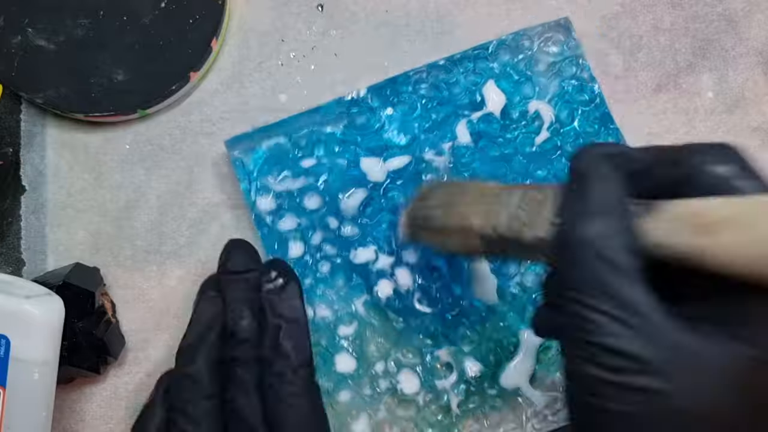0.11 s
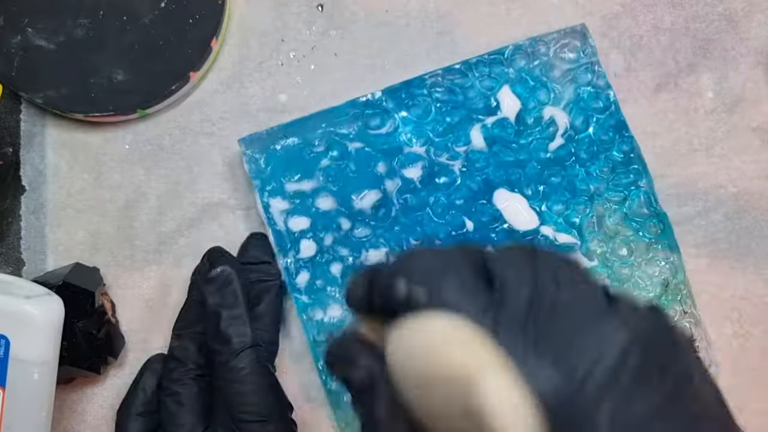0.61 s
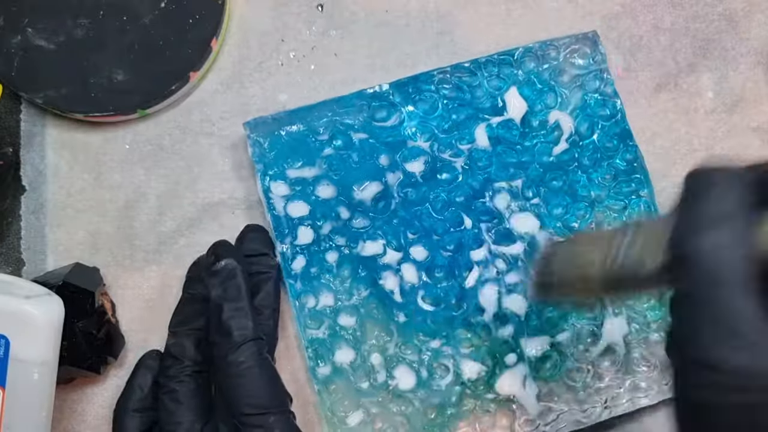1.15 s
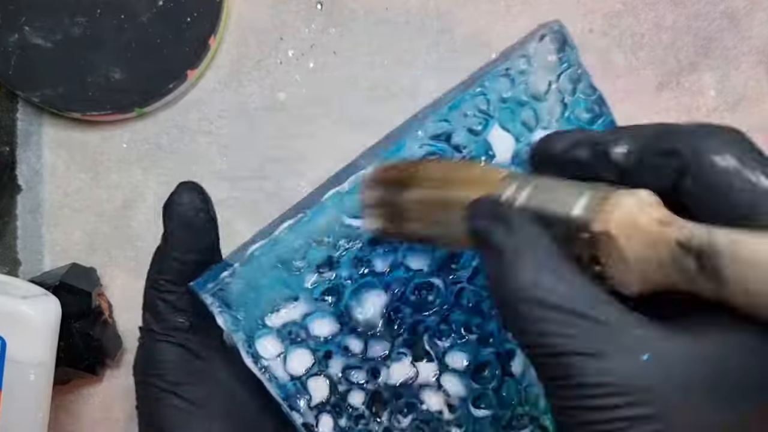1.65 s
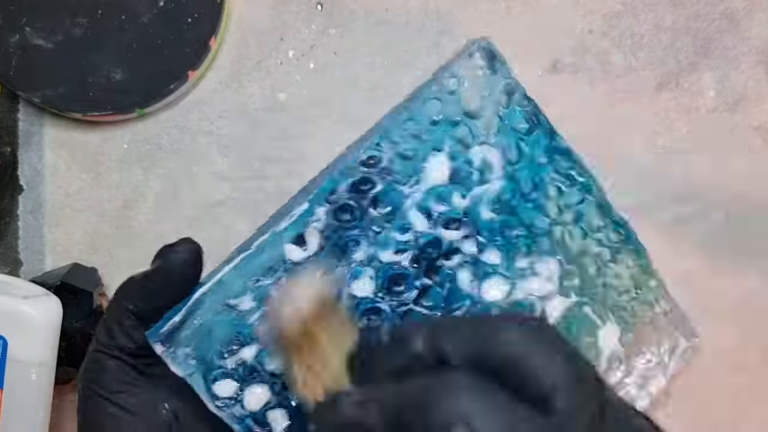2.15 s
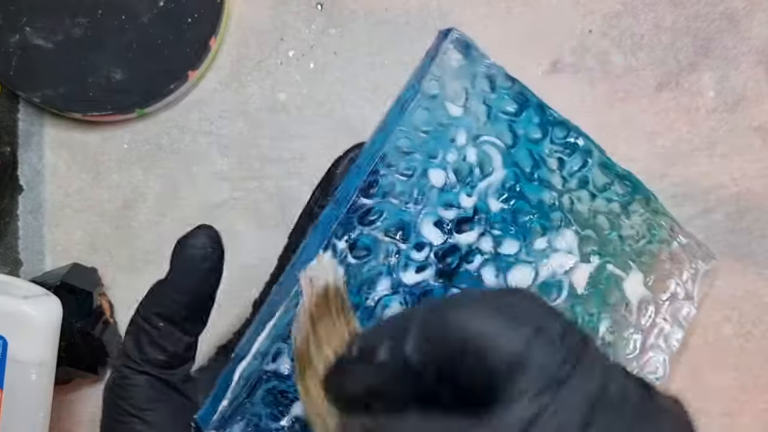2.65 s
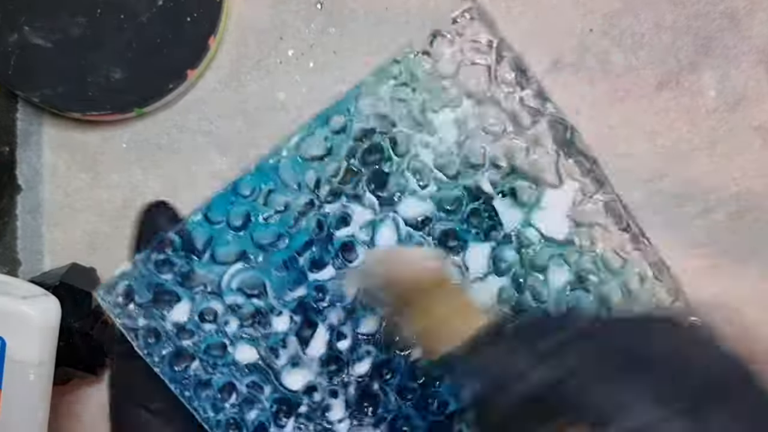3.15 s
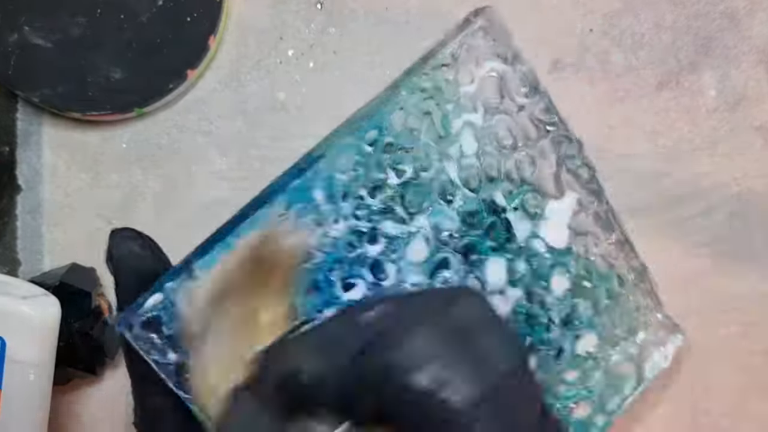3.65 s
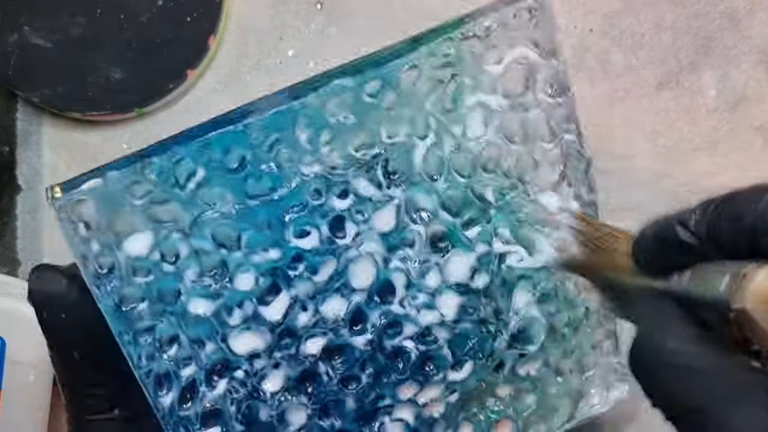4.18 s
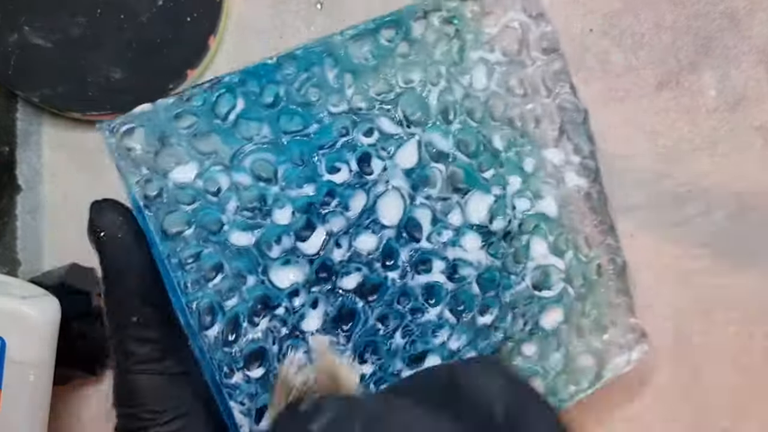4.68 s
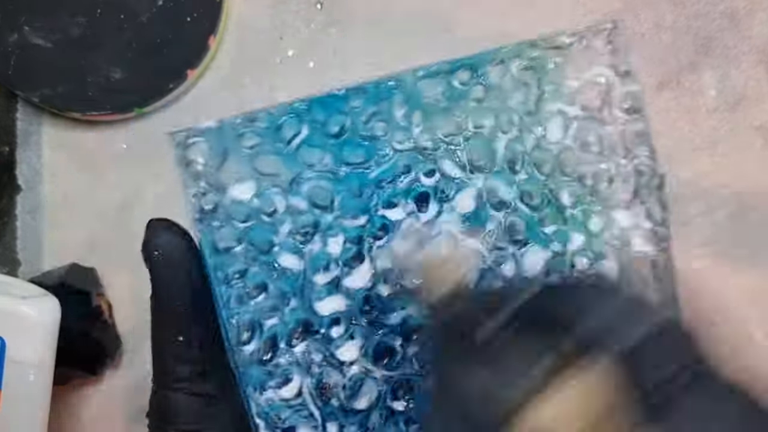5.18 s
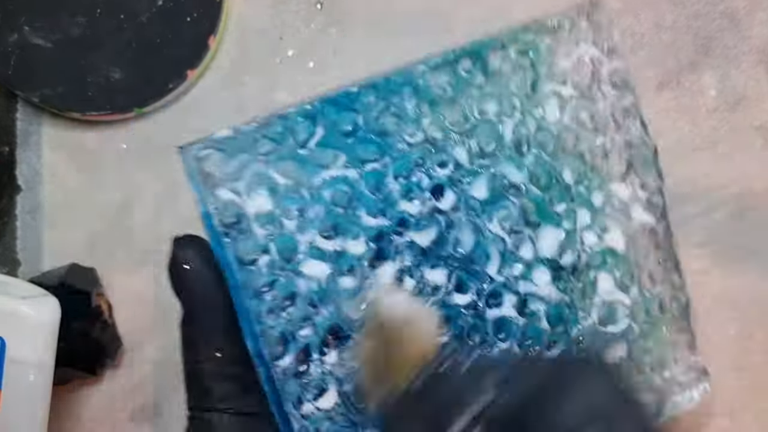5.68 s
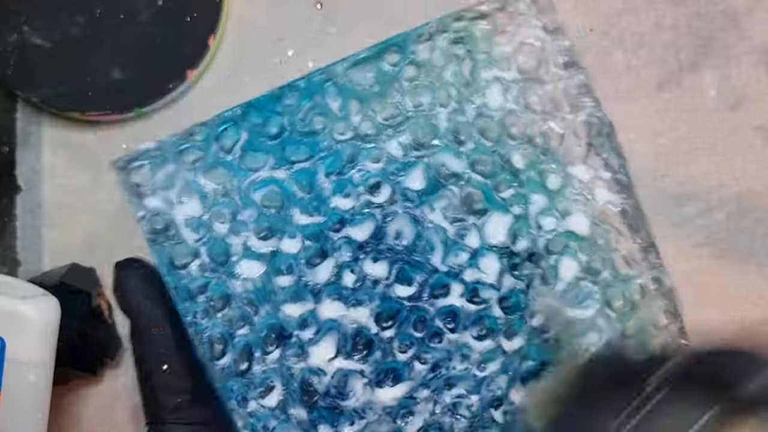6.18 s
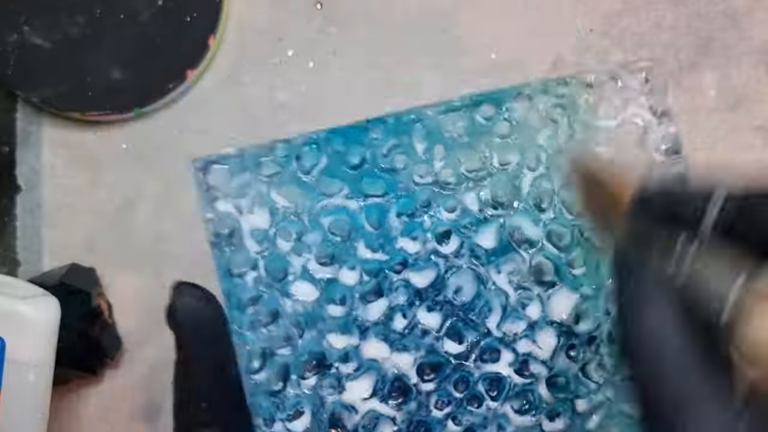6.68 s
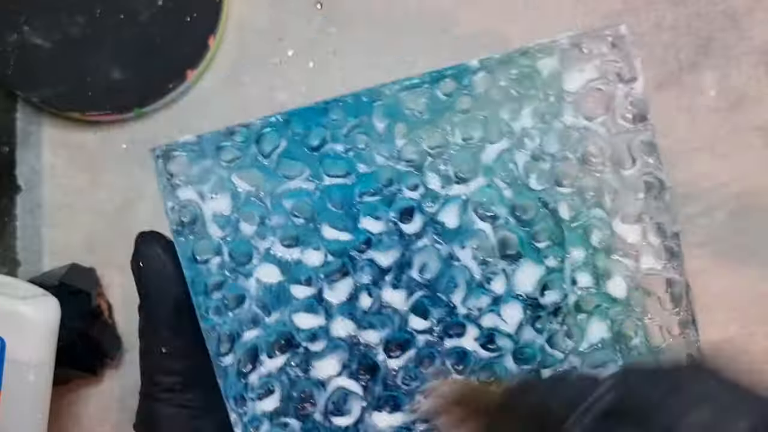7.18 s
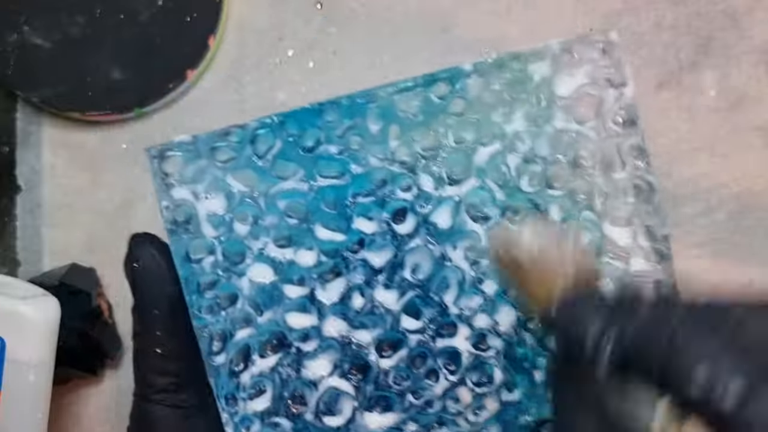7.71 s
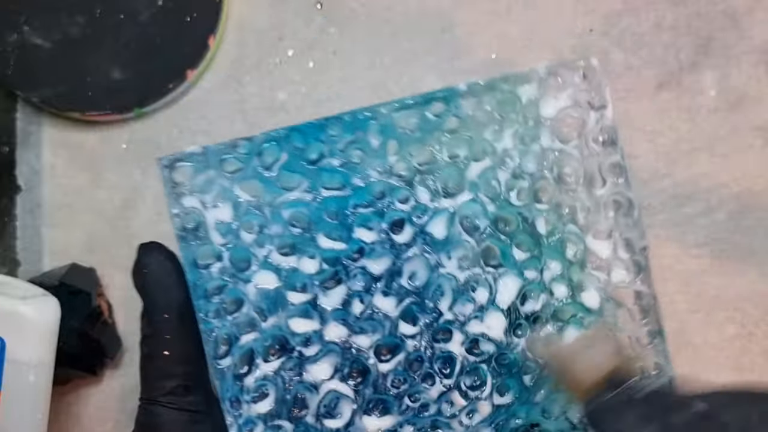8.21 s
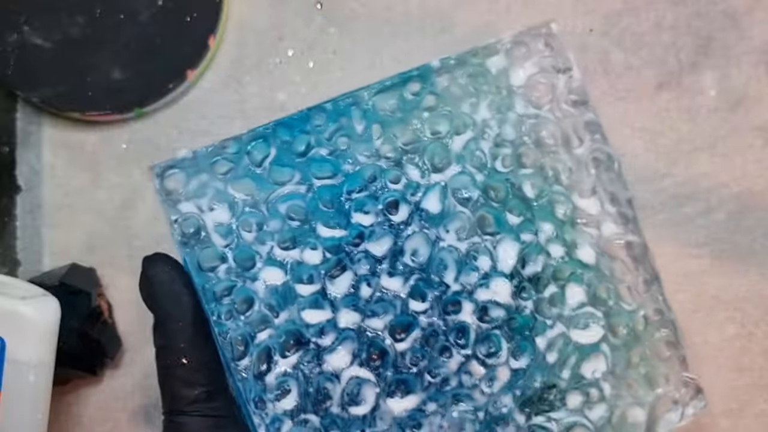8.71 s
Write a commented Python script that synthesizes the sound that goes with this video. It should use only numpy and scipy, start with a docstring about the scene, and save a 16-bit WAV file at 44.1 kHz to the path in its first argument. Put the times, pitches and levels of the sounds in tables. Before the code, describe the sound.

A stiff bristle brush scrubs wet glue over a dimpled resin tile in quick scratchy bursts, with low table thumps and tiny clicks.

```python
"""In a quiet room a bristle brush scrubs glue over a dimpled resin tile: sped-up scrubbing in short spliced bursts.
Flicks and hiss scratch and rub the tile's modes, which ring more freely for the first 3 s, as it rests on the table.
Pushes thump the table top on damped modes and rattle the tile; bristle tips snap out of dimples as clicks with spray.
From 3 s a glove at times sounds the hollow under the tile; from 7.2 s six strokes at natural speed land, drag and lift.
A close pair of microphones hears it all, with a faint answer from the walls."""
import sys
import numpy as np
from scipy import signal
from scipy.fft import rfft, irfft, next_fast_len
from scipy.io import wavfile
from scipy.ndimage import uniform_filter1d, map_coordinates

SR = 44100
rng = np.random.default_rng(int(sys.argv[2]) if len(sys.argv) > 2 else 0)


def transcribe(signal):
    """Save signal, clipped to [-1, 1], as a 16-bit WAV file at the path in sys.argv[1]."""
    frames = np.atleast_2d(signal).T
    limited = np.clip(frames, -1, 1)
    pcm = np.round(limited * 32767).astype(np.int16)
    wavfile.write(sys.argv[1], SR, pcm)


def makeup_ratio(level_db):
    """Linear amplitude ratio for a level in decibels (20 dB per factor of ten)."""
    decades = np.asarray(level_db, float) / 20
    return 10 ** decades


N = 389657
HZ = np.fft.rfftfreq(next_fast_len(N + SR // 4), 1 / SR)
TIME_S = np.arange(N) / SR


def unit(x):
    """Scaled to rms 1."""
    return x / np.sqrt(np.mean(x ** 2) + 1e-20)


def along(points):
    """(Hz, value) points read on a log frequency axis."""
    hz, value = np.transpose(points)
    return np.interp(np.log(HZ + 1), np.log(hz + 1), value)


def at_time(points):
    """(s, value) points read at every sample."""
    return np.interp(TIME_S, *np.transpose(points))


def filtered(x, response):
    """x through a complex frequency response."""
    size = 2 * len(HZ) - 2
    return irfft(rfft(x, size) * response, size)[..., :N]


def drift(per_s):
    """A smooth random curve through per_s random points a second."""
    points = rng.standard_normal(int(N * per_s / SR) + 4)
    return map_coordinates(points, [np.arange(N) * per_s / SR])


# Each row: frequency in Hz, left-right likeness from 0 to 1.
LIKENESS = [(60, 0.9), (300, 0.65), (1400, 0.47), (3100, 0.21), (6800, 0.028)]


def paired(sources, spectrum):
    """Two unrelated sources mixed to left and right of the set likeness, coloured, rms 1."""
    turn = np.arccos(np.clip(along(LIKENESS), 0, 1)) / 2
    mid, side = filtered(sources, makeup_ratio(along(spectrum)) * np.array([np.cos(turn), np.sin(turn)]))
    return unit(np.array([mid + side, mid - side]))


def flicks(per_s, spread_db, share):
    """Single bristles let go at random, sizes with a long tail, over the hiss of the sliding rest."""
    fires, size, sign = rng.random((3, 2, N))
    size_gain = makeup_ratio(-spread_db * np.log(size + 1e-9))
    clicks = (fires < per_s / SR) * size_gain * np.sign(sign - 0.5)
    hiss = rng.standard_normal((2, N))
    return np.sqrt(share) * unit(clicks) + np.sqrt(1 - share) * hiss  # share of the power in clicks


def patchy(x, depth_db, size, order):
    """Random gain patches, order bins wide: wide and brief for bunches letting go, narrow and slow for dimples."""
    z = signal.stft(x, nperseg=size)[2]
    field = uniform_filter1d(rng.standard_normal(z.shape[1:]), order, axis=0)
    field = uniform_filter1d(field, size=3, axis=1)
    return signal.istft(z * makeup_ratio(depth_db * unit(field)), nperseg=size)[1][:, :N]


def swells(start_s, length_s, db, rise):
    """Stereo power of blunt swells, 9 dB down at both ends, each nearer one microphone or the other."""
    power = np.zeros((2, N))
    sway_db = rng.normal(0, 1.3, len(start_s))
    rows = np.broadcast(start_s, length_s, db, np.clip(rise, 0.05, 0.95))
    for (start, length, peak_db, rise), left_db in zip(rows, sway_db):
        first = max(int((start - rise * length) * SR), 0)
        i = np.arange(first, min(int((start + 2 * length) * SR), N))
        lag = (i / SR - start) / length - rise
        away = np.where(lag < 0, -lag / rise, lag / (1 - rise))
        power[:, i] += makeup_ratio(2 * (peak_db - 9 * away ** 3.46) + [[left_db], [-left_db]])
    return power


def pushes(at_s, db, hz, width_s, left_db, left_lag):
    """Soft pushes: a few cycles under a bell-shaped swell; left lags by a share of a cycle."""
    out = np.zeros((2, N + SR))
    t = np.arange(-SR // 20, SR // 20) / SR
    chance = rng.random((len(at_s), 2))
    for (at, peak_db, f, width), (turn, side) in zip(np.broadcast(at_s, db, hz, width_s), chance):
        bell = np.exp(-2.8 * (t / width) ** 2)
        onset = np.sin(np.clip(t / width, 0, np.pi / 2))
        ring_on = 0.071 * (t > 0) * onset * np.exp(-t / 0.019)
        push = (bell + ring_on) * np.cos(2 * np.pi * (f * t + turn + np.array([[-left_lag], [0]])))
        balance_db = (left_db + 1.3 * (side + 0.5)) * np.array([[1], [-1]])
        k = round(at * SR)
        out[:, k:k + len(t)] += makeup_ratio(peak_db + balance_db) * push
    return out[:, SR // 20:][:, :N]


# Each row: frequency in Hz, relative density of the air noise in dB.
AIR = [(18, -23), (30, -13.5), (103, -16), (153, -21), (266, -35.5), (3490, -30.5), (4530, -31.5),
       (7270, -27), (8300, -37.5), (16000, -30.5)]


def air():
    """Faint steady air with a low drone, as shaped noise."""
    noise = patchy(rng.standard_normal((2, N)), depth_db=2.5, size=512, order=8)
    return makeup_ratio(-78) * paired(noise, AIR)


# Each row: time in seconds, tremble level in dB before drift and the dips between bursts.
SHAKE = [(0.0, -64), (1.06, -61), (1.38, -60), (1.45, -76.5), (1.6, -75.5), (1.87, -54.5), (2.4, -61),
         (2.55, -72), (2.95, -65), (3.1, -80.5), (5.3, -82.5), (5.5, -74), (5.7, -84.5), (7, -83),
         (7.2, -78.5), (8.84, -76)]


def tremble():
    """Low tremble of table and hands: bass noise that dips in the gaps between bursts."""
    low_noise = paired(rng.standard_normal((2, N)),
                       [(25, -15), (60, -2.5), (115, 0.5), (170, -11), (300, -25.5), (500, -40.0)])
    start_s, length_s, _ = np.transpose(BURSTS)
    in_burst = swells(start_s, length_s, 0, RISE_SHARE).mean(0)
    gap_db = -6.5
    level = makeup_ratio(at_time(SHAKE) + 3.6 * drift(22))
    return level * low_noise * np.sqrt(in_burst + makeup_ratio(2 * gap_db))


RISE_SHARE = 0.4  # part of a swell spent rising
# Each row: start in seconds, length in seconds, scratch level in dB before flutter.
BURSTS = [(0.019, 0.034, -43.5), (0.057, 0.011, -41), (0.121, 0.044, -48.5), (0.171, 0.028, -58),
          (0.203, 0.044, -63), (0.234, 0.035, -57), (0.351, 0.032, -52.5), (0.39, 0.012, -49.5),
          (0.421, 0.017, -56), (0.459, 0.023, -49.5), (0.511, 0.043, -50.5), (0.565, 0.019, -51),
          (0.642, 0.024, -59.5), (0.7, 0.03, -61), (0.743, 0.062, -58.5), (0.904, 0.026, -51.5),
          (0.954, 0.015, -50), (0.992, 0.023, -54.5), (1.017, 0.03, -56.5), (1.061, 0.038, -59.5),
          (1.187, 0.012, -55.5), (1.208, 0.034, -44), (1.287, 0.036, -52.5), (1.318, 0.039, -55.5),
          (1.36, 0.044, -61.5), (1.44, 0.071, -57), (1.55, 0.034, -66.5), (1.58, 0.07, -64),
          (1.688, 0.025, -61.5), (1.736, 0.035, -59), (1.788, 0.019, -54.5), (1.828, 0.016, -50.5),
          (1.869, 0.026, -56), (1.917, 0.022, -51), (1.997, 0.0086, -66), (2.04, 0.012, -57),
          (2.075, 0.02, -50.5), (2.104, 0.053, -52.5), (2.163, 0.028, -52), (2.194, 0.034, -55),
          (2.229, 0.017, -50), (2.265, 0.0092, -65.5), (2.277, 0.019, -51), (2.341, 0.031, -56.5),
          (2.372, 0.046, -49.5), (2.458, 0.022, -54.5), (2.574, 0.067, -59.5), (2.684, 0.071, -65),
          (2.763, 0.018, -50.5), (2.803, 0.024, -60.5), (2.847, 0.07, -52.5), (2.9, 0.068, -58.5),
          (2.98, 0.066, -54.5), (3.038, 0.03, -53.5), (3.074, 0.03, -55.5), (3.104, 0.03, -54.5),
          (3.133, 0.025, -54), (3.159, 0.036, -52.5), (3.194, 0.048, -51.5), (3.265, 0.025, -49),
          (3.301, 0.018, -61.5), (3.342, 0.018, -55.5), (3.369, 0.042, -55.5), (3.404, 0.036, -51.5),
          (3.453, 0.031, -51.5), (3.483, 0.046, -54), (3.519, 0.043, -52.5), (3.56, 0.029, -54.5),
          (3.6, 0.031, -48), (3.637, 0.065, -56.5), (3.7, 0.079, -59.5), (3.763, 0.038, -57),
          (3.796, 0.028, -55.5), (3.828, 0.062, -50), (3.869, 0.016, -49.5), (3.908, 0.012, -53),
          (3.938, 0.0098, -51.5), (3.955, 0.04, -55.5), (4, 0.023, -49.5), (4.053, 0.022, -50),
          (4.086, 0.037, -54), (4.124, 0.022, -52.5), (4.153, 0.011, -53.5), (4.197, 0.018, -64.5),
          (4.251, 0.0077, -54), (4.267, 0.02, -54.5), (4.306, 0.025, -40), (4.358, 0.052, -53.5),
          (4.395, 0.09, -58), (4.489, 0.028, -45), (4.525, 0.048, -52.5), (4.589, 0.029, -52),
          (4.631, 0.042, -51), (4.677, 0.062, -54.5), (4.726, 0.025, -54), (4.768, 0.037, -56.5),
          (4.802, 0.023, -60), (4.845, 0.025, -58.5), (4.915, 0.01, -52.5), (4.943, 0.018, -52.5),
          (4.969, 0.033, -57), (5.031, 0.03, -63), (5.077, 0.019, -41.5), (5.119, 0.035, -53),
          (5.168, 0.043, -57), (5.214, 0.013, -54), (5.234, 0.069, -57), (5.33, 0.056, -54),
          (5.374, 0.049, -56), (5.449, 0.016, -63.5), (5.513, 0.047, -59), (5.562, 0.055, -50),
          (5.704, 0.066, -52.5), (5.751, 0.028, -49), (5.797, 0.038, -46), (5.848, 0.027, -49),
          (5.884, 0.084, -54.5), (5.99, 0.091, -58), (6.117, 0.039, -58), (6.163, 0.049, -48.5),
          (6.225, 0.049, -54), (6.282, 0.041, -49), (6.336, 0.1, -52), (6.402, 0.061, -51),
          (6.476, 0.036, -49.5), (6.518, 0.02, -53), (6.552, 0.033, -51.5), (6.587, 0.021, -51),
          (6.619, 0.032, -56), (6.663, 0.022, -51), (6.7, 0.031, -59), (6.758, 0.023, -54),
          (6.797, 0.018, -48), (6.837, 0.029, -45.5), (6.863, 0.027, -51), (6.909, 0.028, -57.5),
          (6.943, 0.018, -43.5), (6.986, 0.043, -45), (7.058, 0.022, -46), (7.08, 0.033, -48.5)]


def bursts():
    """Scratch power of the sped-up scrubbing in short spliced bursts."""
    return swells(*np.transpose(BURSTS), RISE_SHARE)


def stray_touches():
    """Scratch power of faint touches, one at random in each slot until shortly before the strokes."""
    per_s, until_s, length_s, faintest_db = 22, 7.05, 0.05, -68.5
    when, size = rng.random((int(per_s * until_s), 2)).T
    start_s = (np.arange(len(when)) + when) / len(when) * until_s
    return swells(start_s, length_s, faintest_db + 6 * size, rise=0.28)


# Each row: frequency in Hz, relative density of the bristle noise in dB.
BRISTLE = [(900, -41), (2000, -25), (3200, -0.5), (4500, 3), (7300, 3.5), (8400, -6.5), (14000, -8.5),
           (15600, -9), (16200, -23.5)]
# Top treble as the tile is turned. Each row: time in seconds, gain above 8200 Hz in dB.
GLOSS = [(0, 2.5), (1, 3), (2.001, 6.5), (3, 3), (4.2, 5.5), (5.2, 2.5), (6.002, 3), (7, 2), (8.84, 6)]


def bristle_tips():
    """Treble of sliding tips: dense flicks, patched by bunches and by dimples."""
    tips = flicks(3500, spread_db=2.0, share=0.54)
    tips = patchy(tips, depth_db=2.5, size=256, order=60)
    tips = paired(patchy(tips, depth_db=2.5, size=1024, order=4), BRISTLE)
    return tips + (makeup_ratio(at_time(GLOSS)) - 1) * filtered(tips, HZ > 8200)


# Each row: mode frequency in Hz, width in Hz, relative level in dB.
TILE_MODES = [(570, 44, -12.5), (744, 50, 0), (1154, 254, 2.5), (1693, 61, -2), (2000, 12, -21.5),
              (2287, 63, 0.5), (2410, 38, -15), (2670, 12, -3), (3380, 120, -2)]


def tile():
    """The tile's answer to a force: damped resonances of alternating sign."""
    answer = 0
    for k, (hz, width_hz, db) in enumerate(TILE_MODES):
        mode = 1j * HZ * width_hz / (hz * hz - HZ * HZ + 1j * HZ * width_hz)
        answer = answer + (-1) ** k * makeup_ratio(db) * mode
    return answer


# Each row: frequency in Hz, relative density of the rubbing noise in dB.
HUM = [(150, -23.5), (420, -25.5), (670, -19), (1150, -12), (1800, -4.5), (3000, -4.5), (4500, -17)]


def tile_body():
    """Rubbing noise plus the modes it rings, freer until the tile is picked up."""
    rub = patchy(flicks(900, spread_db=3.5, share=0.59), depth_db=4.0, size=1024, order=4)
    rub = paired(rub, HUM)
    lifted_s, resting_ring_db = 3.0, 3.5
    return unit(0.69 * rub + makeup_ratio(resting_ring_db * (TIME_S < lifted_s)) * filtered(rub, tile()))


# How hard the brush leans on the tile. Each row: time in seconds, hum over scratch in dB before HUM_GAIN_DB.
LEAN = [(0, -11.5), (.8, -12.5), (1.6, -13.5), (2.4, -12), (3.2, -11.5), (4, -12), (4.8, -10), (5.6, -9),
        (6.3, -12), (6.9, -7.5), (7.4, -11), (7.9, -4.5), (8.3, -9), (8.84, -6)]
HUM_GAIN_DB = 5.5  # for all tile hum


def brush():
    """Each contact scratches in the treble and makes the tile hum."""
    scratch = bursts() + strokes() + stray_touches()
    scratch *= makeup_ratio(2 * 2.5 * drift(90) - 1.5)  # bunches of bristles catch and let go within a contact
    lean_db = at_time(LEAN) + 2.5 * drift(25)
    hum = scratch * makeup_ratio(2 * lean_db) + grates()
    return np.sqrt(scratch) * bristle_tips() + np.sqrt(hum) * tile_body() * makeup_ratio(HUM_GAIN_DB)


# Each row: time in seconds, level in dB before each mode's offset.
TAPS = [(0.025, -47), (0.134, -53), (0.22, -65), (0.363, -60.5), (0.576, -47.5), (.908, -61), (.997, -56.5),
        (1.163, -59), (1.205, -44), (1.865, -62), (2.015, -32.5), (2.049, -45), (2.078, -50),
        (2.305, -46.5), (2.345, -60), (2.738, -63), (2.806, -56), (2.905, -38.5), (2.955, -52),
        (3.207, -61), (3.861, -58), (3.937, -55.5), (4.537, -57.5), (6.175, -62.5), (6.714, -67),
        (8.721, -55.5)]


def taps():
    """Firmer knocks ring two upper modes of the table top, detuned together."""
    at_s, db = np.transpose(TAPS)
    hz = 345 * np.exp(rng.normal(0, 0.1, len(at_s)))
    upper = pushes(at_s, db - 8.5, 1.8 * hz, 0.0042, left_db=0.0, left_lag=0.064)
    return upper + pushes(at_s, db + 3.5, hz, 0.0035, left_db=-2.0, left_lag=0.14)


# Each row: time in seconds, peak level in dB before left-right balance, half-level width in seconds.
THUDS = [(0.028, -43.5, .004), (0.124, -35, 0.013), (0.209, -36.5, 0.013), (.258, -33.5, 0.0076),
         (0.29, -48.5, 0.012), (0.466, -45, 0.012), (0.584, -34.5, 0.011), (.793, -48, .011),
         (.813, -41, 0.0083), (.912, -42, .01), (0.964, -44.5, 0.0053), (0.996, -37, 0.0064),
         (1.03, -48.5, 0.014), (1.067, -49, 0.016), (1.121, -36, 0.0085), (1.165, -43.5, 0.014),
         (1.202, -23, .011), (1.219, -35, 0.0054), (1.324, -39, 0.0092), (1.355, -46.5, 0.033),
         (1.652, -36.5, 0.0054), (1.67, -36.5, .01), (1.692, -36.5, 0.018), (1.801, -47, 0.02),
         (1.867, -27, 0.011), (1.933, -47.5, 0.022), (1.975, -37, 0.0084), (2.013, -24, .004),
         (2.046, -26, 0.0064), (2.082, -31, .008), (2.174, -45.5, 0.014), (2.225, -45.5, 0.0092),
         (2.273, -39.5, 0.0088), (2.306, -28, 0.0077), (2.336, -33, 0.014), (2.38, -34, .014),
         (2.747, -45.5, 0.0075), (2.813, -39.5, 0.011), (2.874, -44, 0.016), (2.909, -32, 0.015),
         (2.949, -40, 0.008), (3.942, -54, 0.011), (4.545, -56, 0.0065), (5.51, -55, 0.015),
         (8.424, -59, 0.027)]


def thuds():
    """Pushes flex the table top on its low mode, each detuning it a little."""
    at_s, db, width_s = np.transpose(THUDS)
    hz = 116.5 * np.exp(0.067 * rng.standard_normal(len(at_s)))
    return pushes(at_s, db, hz, width_s, left_db=-2.0, left_lag=0.013)


# Each row: frequency in Hz, relative density of the chatter in dB.
RATTLE = [(130, -31.5), (200, 3.5), (350, -4.5), (600, -12), (1000, -29.5)]


def rattle():
    """The tile chatters on the wood, as sparse clicks and hiss, while the table top flexes."""
    at_s, db, width_s = np.transpose(THUDS)
    chatter = paired(flicks(280, spread_db=3.0, share=0.6), RATTLE)
    power = swells(at_s - width_s, 3.77 * width_s, db - 28.5, rise=0.3)
    return np.sqrt(power) * chatter


# Each row: start in seconds, length in seconds, hum level in dB before HUM_GAIN_DB.
GRATES = [(0.129, .02, -58.5), (0.355, 0.022, -62), (1.183, 0.011, -57.5), (1.318, .05, -64.5),
          (2.003, 0.011, -44.5), (2.039, 0.014, -53), (2.261, .01, -48), (5.845, 0.013, -48.5),
          (6.941, .018, -52)]


def grates():
    """Hum power as the tile's edge grates on the table."""
    return swells(*np.transpose(GRATES), RISE_SHARE)


# Each row: time in seconds, relative snap level in dB, relative tile ring above the snap in dB.
SNAPS = [(0.133, -29.5, -30), (0.563, -40, -2), (0.573, -36.5, 6.5), (1.193, -41.5, 2.5),
         (1.215, -23.5, -25), (1.306, -33.5, -16.5), (2.005, -45.5, 11), (2.014, -46, -6),
         (2.04, -50.5, 13.5), (2.279, -36, -13), (2.903, -47, -1.5), (3.202, -45.5, 0.5),
         (4.061, -32.5, -26.5), (4.311, -31.5, -28), (4.502, -30, -22), (5.757, -36, -15),
         (5.802, -33.5, -33), (5.849, -24, -27), (6.357, -31, -44), (6.854, -32.5, -34),
         (6.945, -33, -11.5), (7.062, -51, -3.5), (7.328, -39, -20), (7.51, -28.5, -44), (8.171, -29, -40),
         (8.397, -32.5, -21), (8.704, -32.5, -20)]


def snaps():
    """Bristle bunches snap over a rim: a sharp click, a short spray, and a knock that rings the tile."""
    clicks, blows = np.zeros((2, N + SR)), np.zeros(N)
    t = np.arange(SR // 50) / SR
    spray = 0.61 * makeup_ratio(-60 * t / 0.0029) + 0.54 * makeup_ratio(-60 * t / 0.014)  # 60 dB decays in 2.9 and 14 ms
    for at_s, db, ring_db in SNAPS:
        k = round(at_s * SR)
        clicks[:, k:k + len(t)] += makeup_ratio(db - 9) * spray * rng.standard_normal((2, len(t)))
        clicks[:, k + 1] -= makeup_ratio(db - 7)  # the first tip to go makes one sharp spike
        blows[k] = makeup_ratio(db + ring_db + 38)
    cushion = 1 / (1 + 1j * HZ / 1800) ** 3  # glue softens the contact
    ring = filtered(blows, tile() * cushion) * makeup_ratio([[1.8], [-1.8]])
    return filtered(clicks[:, :N], makeup_ratio(along(BRISTLE) + 9.0)) + ring


# Each row: start in seconds, length in seconds, level in dB.
SHIFTS = [(3.098, 0.097, -76), (3.451, 0.088, -73.5), (3.81, 0.073, -70), (3.937, 0.055, -68),
          (4.092, 0.12, -77), (4.434, 0.097, -74), (4.598, .07, -73), (4.706, 0.095, -80),
          (5.4, 0.13, -82.5), (6.007, 0.11, -81), (6.35, .07, -71), (6.688, 0.066, -79), (7.83, .08, -86),
          (8.392, .06, -72), (8.66, 0.088, -70.5)]


def glove():
    """The glove shifts under the tile: rubbing noise through the resonant hollow between tile and palm."""
    hz, width_hz = 318, 128
    hollow = 1j * HZ * width_hz / (hz ** 2 - HZ ** 2 + 1j * HZ * width_hz)
    rub = paired(flicks(300, spread_db=2.5, share=0.81), [(100, 0)])
    return np.sqrt(swells(*np.transpose(SHIFTS), rise=0.47)) * unit(filtered(rub, hollow ** 2))


# Strokes at natural speed. Each row: landing in seconds, landing level in dB, fullest in seconds,
# fullest level in dB, lift-off in seconds; levels before flutter.
STROKES = [(7.236, -58.5, 7.315, -49, 7.356), (7.466, -50, 7.53, -54, 7.595),
           (7.755, -52, 7.86, -48, 7.921), (8.08, -54, 8.165, -49, 8.228),
           (8.345, -58, 8.396, -45.5, 8.441), (8.574, -55, 8.7, -47, 8.766)]


def strokes():
    """Scratch power of a sharp landing, a drag that arches up to its fullest, and a lift-off."""
    land_s, land_db, *_ = np.transpose(STROKES)
    power = swells(land_s, 0.02, land_db, rise=0.37)
    for land, _, full, full_db, lift in STROKES:
        rising_db = -17 * abs((full - TIME_S) / (full - land)) ** 1.9
        lifting_db = -9 * abs((TIME_S - full) / (lift - full)) ** 3  # stops more abruptly
        drag_db = np.where(TIME_S < full, rising_db, lifting_db)
        power += (TIME_S > land) * makeup_ratio(2 * (full_db + drag_db))
    return power


def walls(x):
    """A faint answer from the walls: decaying noise, 60 dB in 0.78 s, dulled above 4 kHz."""
    t = np.arange(SR // 3) / SR
    tail = rng.standard_normal((2, len(t))) * makeup_ratio(-60 * t / 0.78)
    echo = signal.fftconvolve(x, tail / np.linalg.norm(tail[0]), axes=1)[:, :N]
    return filtered(echo, 1 / (1 + (HZ / 4000) ** 2))


def scene():
    """Brush and snaps over the table, in the room."""
    near = brush() + snaps()
    on_table = taps() + thuds() + rattle()
    return air() + tremble() + near + makeup_ratio(-39.5) * walls(near) + on_table + glove()


def roll_off(x):
    """The treble ends steeply here."""
    return signal.sosfilt(signal.butter(12, 16810, fs=SR, output="sos"), x)


# Each row: frequency in Hz, left over right in dB.
LEFT_OVER_RIGHT = [(100, .5), (1300, 1), (2400, -0.9), (4400, 2.5), (8000, 0.5), (15000, 3)]


def record(dry):
    """Microphone pair: left a little brighter, a resonant sound inlet, nothing above the band limit."""
    tilt_db = along(LEFT_OVER_RIGHT) / 2
    inlet_hz, inlet_width_hz, top_hz = 7350, 400, 15900
    damping = 1j * HZ * inlet_width_hz
    inlet = 1 + 0.5 * damping / (inlet_hz ** 2 - HZ ** 2 + damping)
    mix = filtered(dry, makeup_ratio([tilt_db, -tilt_db]) * inlet * (HZ < top_hz))
    return roll_off(mix)


dry = scene()
out = record(dry)
transcribe(out)
```